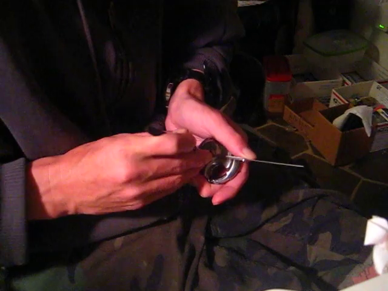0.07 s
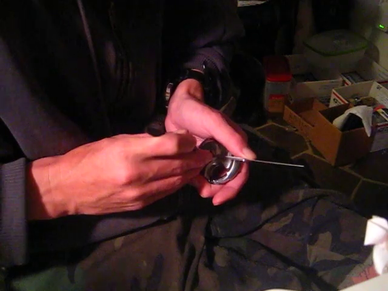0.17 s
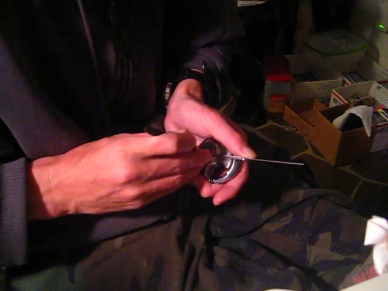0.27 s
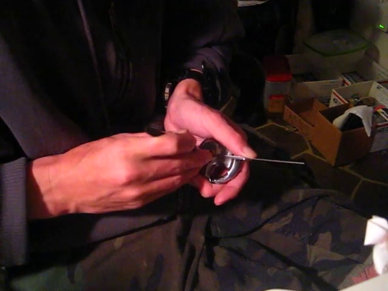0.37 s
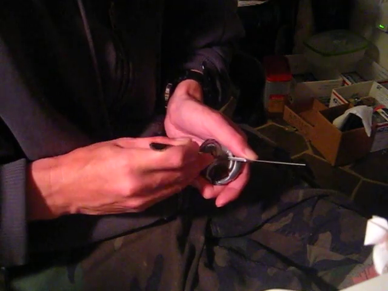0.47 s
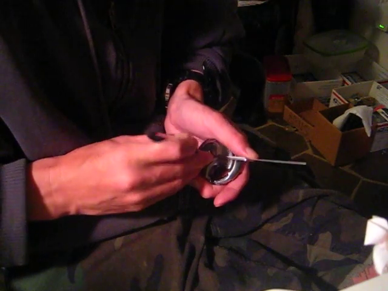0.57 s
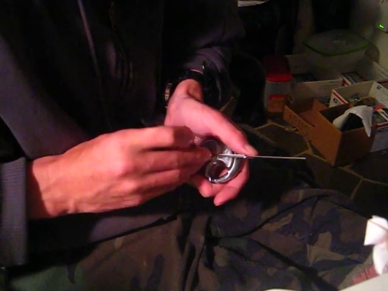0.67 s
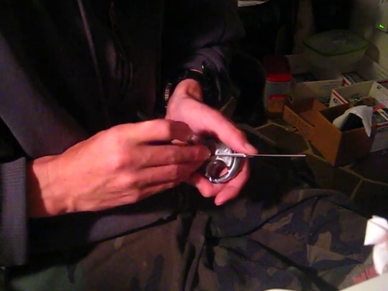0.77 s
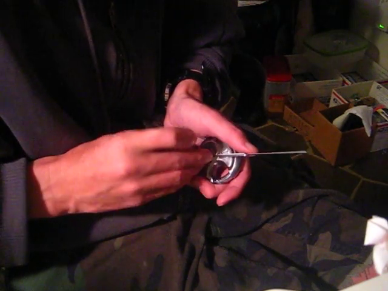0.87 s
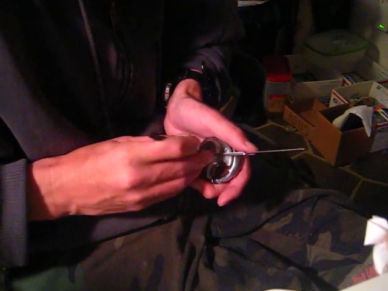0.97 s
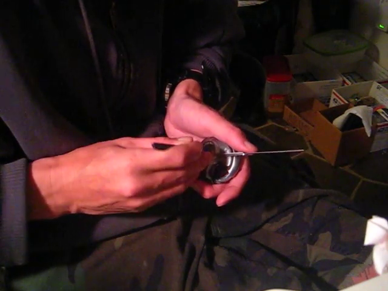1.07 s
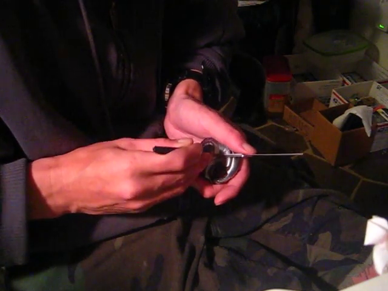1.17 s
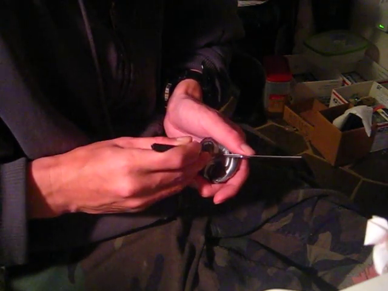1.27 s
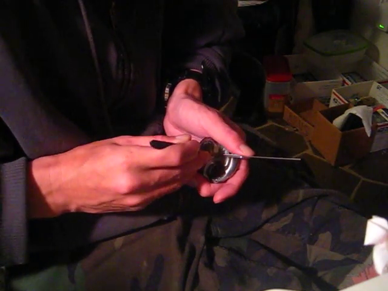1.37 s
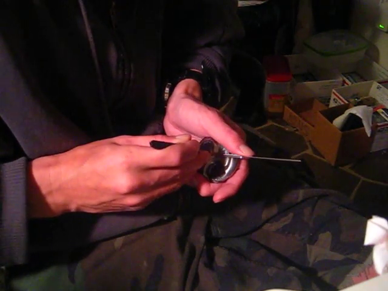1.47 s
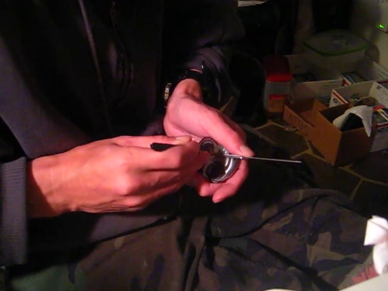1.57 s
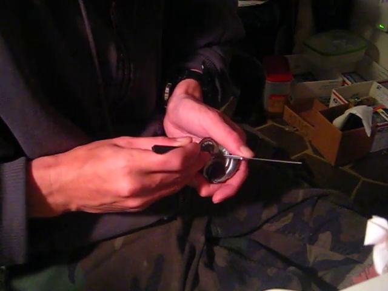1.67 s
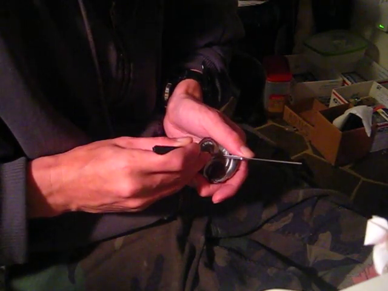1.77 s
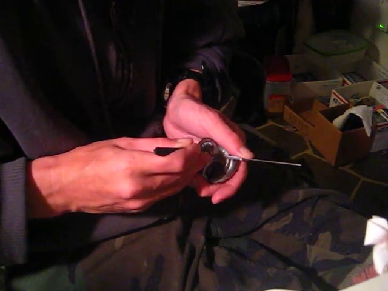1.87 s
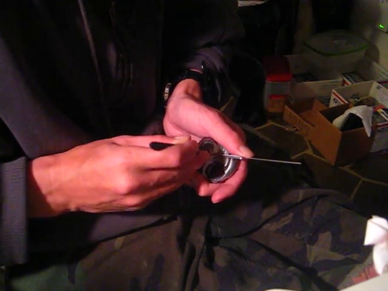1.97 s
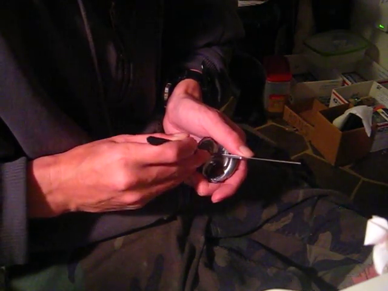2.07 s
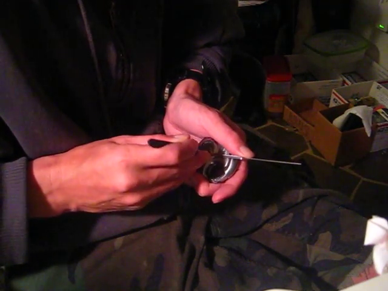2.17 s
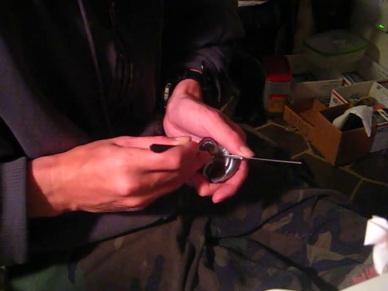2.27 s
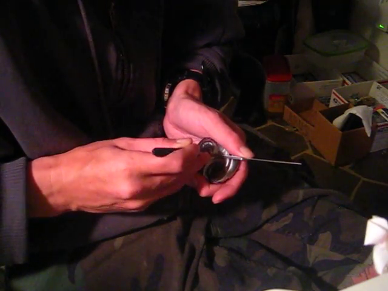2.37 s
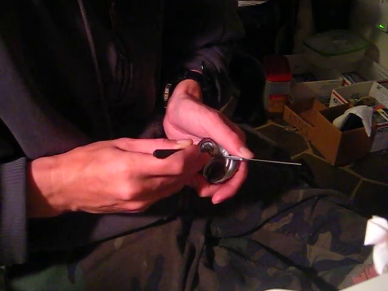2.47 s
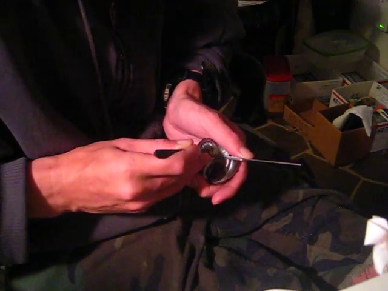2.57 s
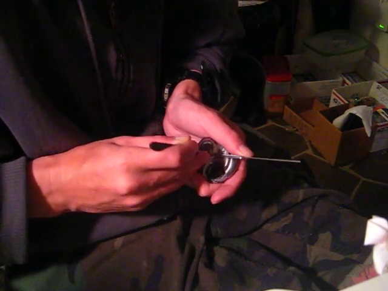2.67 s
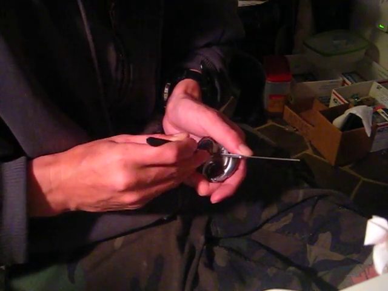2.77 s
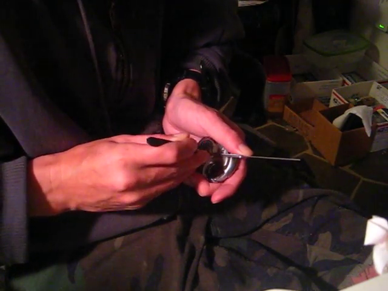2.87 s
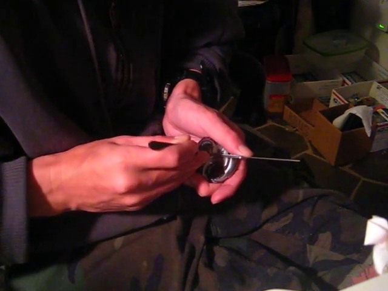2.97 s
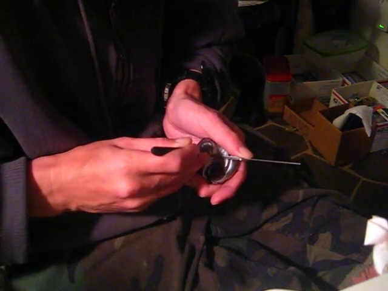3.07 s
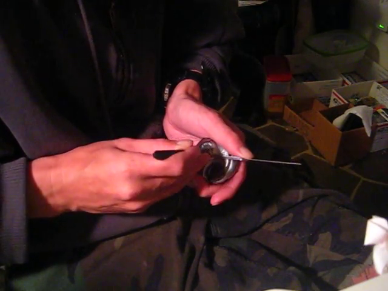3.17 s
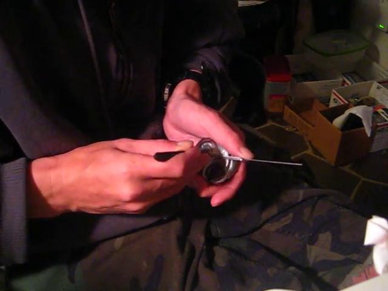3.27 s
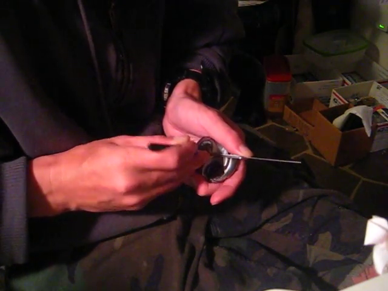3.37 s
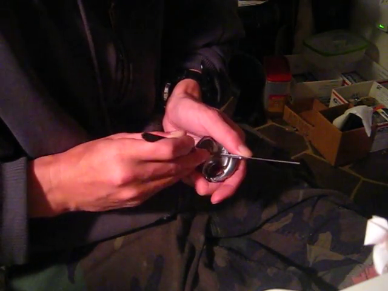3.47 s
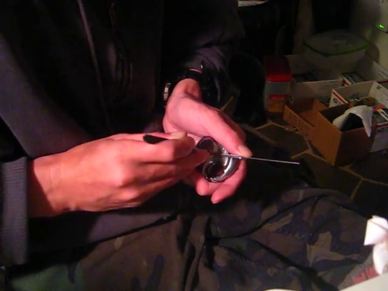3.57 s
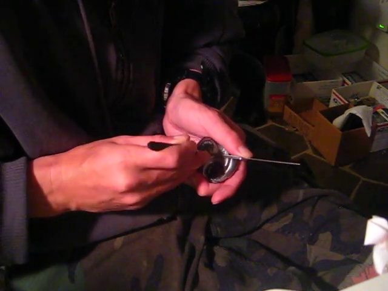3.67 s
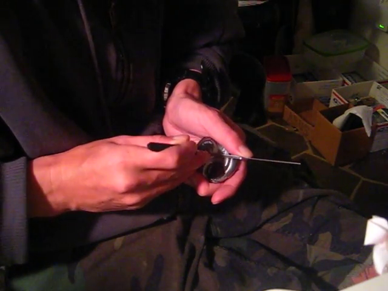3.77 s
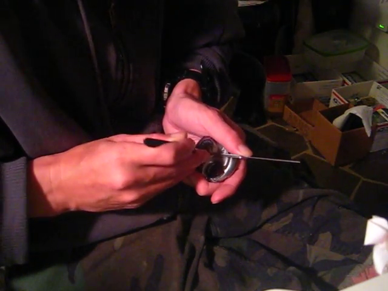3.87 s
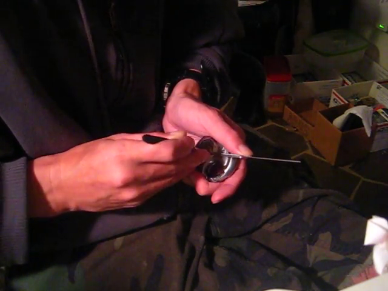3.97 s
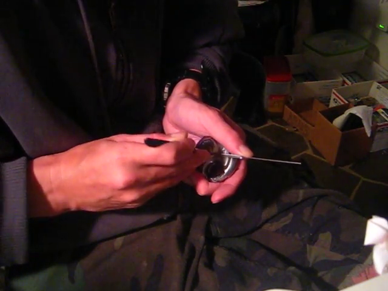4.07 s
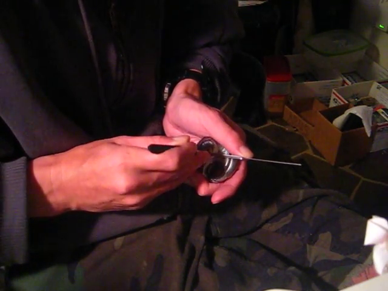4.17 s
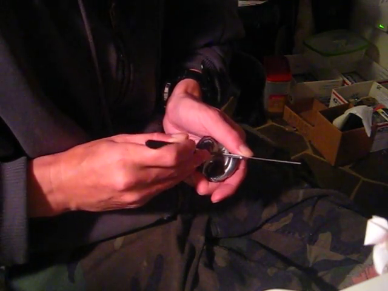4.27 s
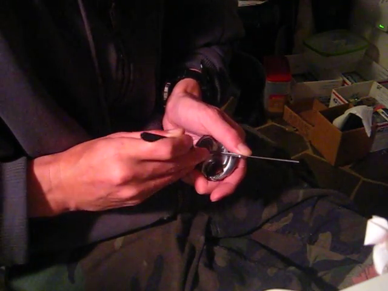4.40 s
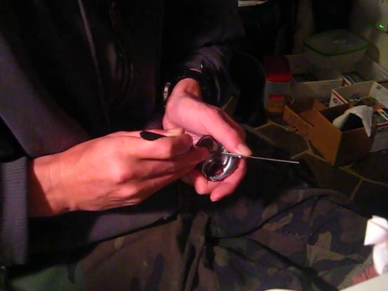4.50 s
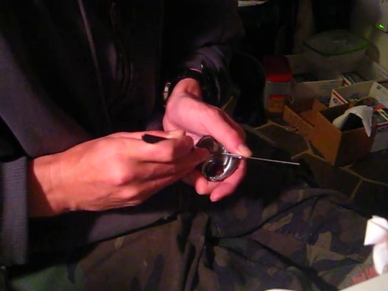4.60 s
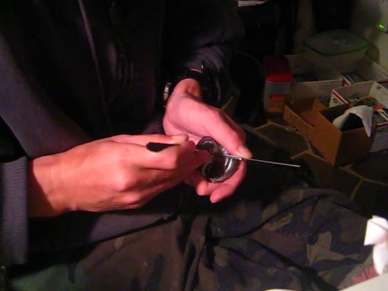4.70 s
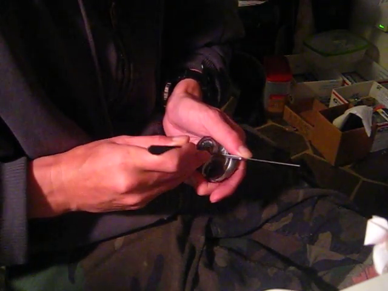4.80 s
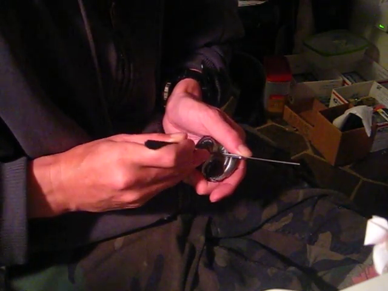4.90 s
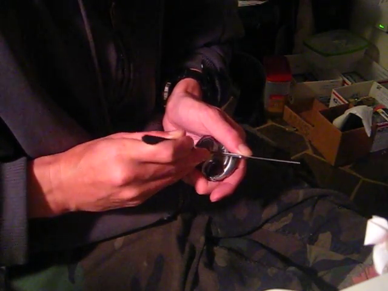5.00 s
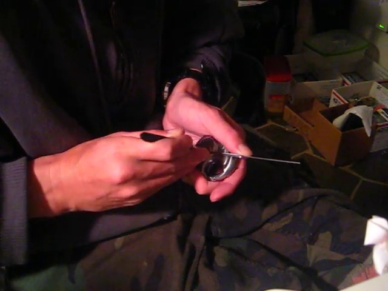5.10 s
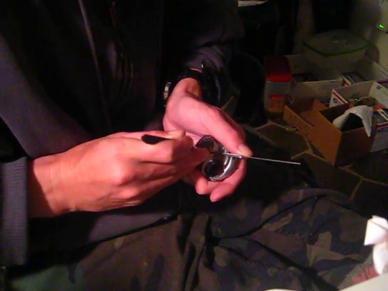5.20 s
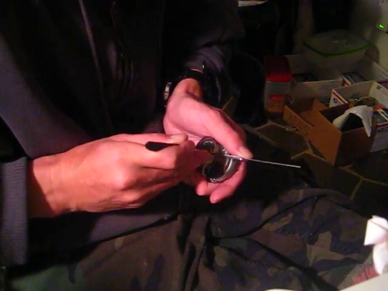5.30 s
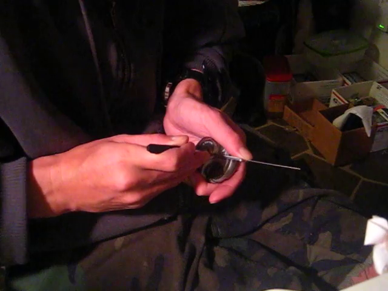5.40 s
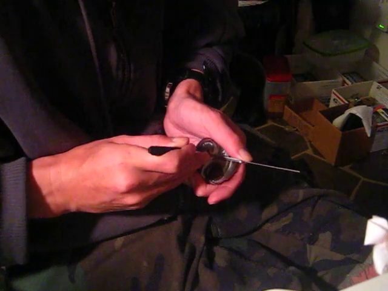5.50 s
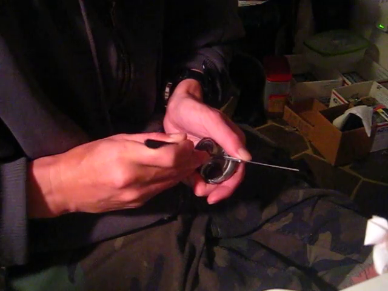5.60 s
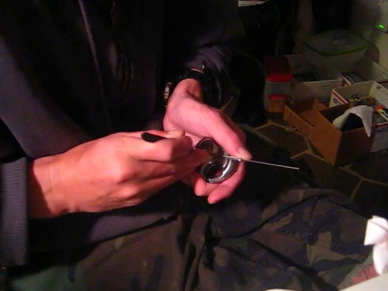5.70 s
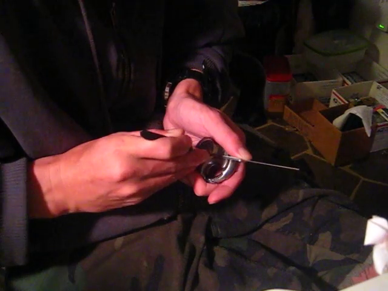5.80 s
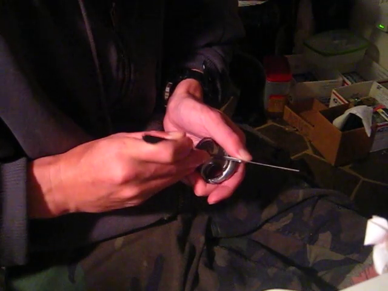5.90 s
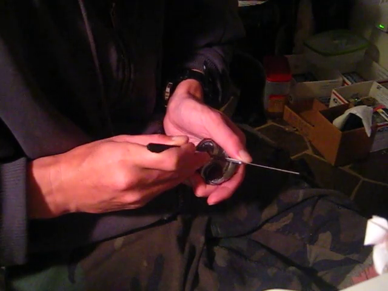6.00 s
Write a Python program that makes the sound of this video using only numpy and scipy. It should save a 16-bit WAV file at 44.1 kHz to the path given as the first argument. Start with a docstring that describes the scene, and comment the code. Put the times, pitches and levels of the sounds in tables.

```python
"""From the start a small camera's microphone hisses, its electronics whine and the bass crackles faintly.
About a metre away a thin steel pick drags over the pins of a hand-held padlock, ringing near 3 kHz.
Then the pick slips: a chatter of a millisecond or two sets the finger-damped lock into free vibration.
Nearby surfaces reflect each sound, and the cluttered room reverberates briefly.
The slips crowd toward the loudest, near 0.9 s; strokes and scattered slips go on until about 6 s."""
import sys
import numpy as np
from scipy import signal
from scipy.fft import rfft, irfft, next_fast_len
from scipy.io import wavfile

SR = 44100
rng = np.random.default_rng(int(sys.argv[2]) if len(sys.argv) > 2 else 0)


def put_to_file(sound):
    """Save the sound as 16-bit audio at rate SR, in the file named by the first command-line argument."""
    columns = np.atleast_2d(sound).T  # one column per channel
    safe = np.clip(columns, -1, 1)
    whole_steps = np.round(safe * 32767)
    wavfile.write(sys.argv[1], SR, whole_steps.astype(np.int16))


N = 266628


def undb(db):
    """Decibel law: amplitude grows tenfold for every 20 dB."""
    return 10 ** (np.asarray(db) / 20)


# Spectrum of the noise floor: f/Hz, relative spectral level/dB
HISS_SPECTRUM = [(40, -2), (350, -5), (2100, -9), (3000, -9.5), (5200, -10.5), (5700, -9.5), (7000, -14.5),
                 (9300, -11.5), (10700, -5), (11900, -10), (12750, -17), (13500, -11), (14450, -10),
                 (15700, -14.5)]
def hiss(level_db=-49.5):
    """Broadband random noise of microphone and room, spectrally shaped, with a slight slow sway."""
    size = next_fast_len(N)
    hz = np.maximum(np.arange(size // 2 + 1) * SR / size, 1)
    knot_hz, knot_db = np.transpose(HISS_SPECTRUM)
    gain = undb(np.interp(np.log(hz), np.log(knot_hz), knot_db))
    noise = irfft(rfft(rng.standard_normal(size)) * gain, size)[:N]
    sway_db = 0.1 * np.interp(np.arange(N), np.linspace(0, N, 60), rng.standard_normal(60))
    return undb(level_db + sway_db) * noise / noise.std()


# Clock tones of the camera: f/Hz, rms level/dB, phase restart rate/Hz (0 runs freely)
CLOCK_TONES = [(7569, -57, 30), (15138, -62, 30), (7866, -61.5, 29.97), (11622, -73, 0), (15734.3, -75, 0),
               (531.4, -76, 0)]
def whine():
    """Phase modulation: a clock tone restarted at every frame splits into lines one frame rate apart."""
    t, out = np.arange(N) / SR, 0
    for hz, db, frame_hz in CLOCK_TONES:
        elapsed = (t + rng.random()) % (1 / frame_hz) if frame_hz else t
        out += undb(db) * np.sqrt(2) * np.sin(2 * np.pi * hz * elapsed)
    return out


# Envelope of the faint bass crackle: t/s, rms level/dB
CRACKLE_LEVELS = [(0, -64), (.5, -70.5), (.7, -58), (2.15, -73.5), (2.3, -59.5), (3.2, -66), (4.25, -61),
                  (5.6, -65), (5.85, -58.5), (6.05, -64)]
def crackle(pops_per_s=150, cutoff_hz=413):
    """Shot noise: random impulses of either sign, band-limited to dull pops."""
    impulses = (rng.random(N) < pops_per_s / SR) * rng.standard_normal(N)
    pops = signal.sosfilt(signal.butter(1, [30, cutoff_hz], "bandpass", fs=SR, output="sos"), impulses)
    pops = signal.sosfilt(signal.butter(1, cutoff_hz, fs=SR, output="sos"), pops)
    times, db = np.transpose(CRACKLE_LEVELS)
    return undb(np.interp(np.arange(N) / SR, times, db)) * pops / pops.std()


# Strokes of the pick over the pins: onset t/s, duration/s, rms level/dB
STROKES = [(0, 0.33, -64), (0.72, 0.26, -64), (1.053, 0.27, -64), (1.52, 0.28, -69), (2.03, 0.29, -62.5),
           (3.14, 0.1, -62), (3.357, 0.1, -61.5), (3.875, 0.47, -63), (5.03, 0.33, -64.5),
           (5.583, 0.47, -64)]
def scrape(slips_per_s=900, fade_s=0.075):
    """Stick-slip friction: dense tiny impulses excite the lock's modes near 3 kHz."""
    occurrence, size = rng.random((N, 2)).T
    polarity = np.sign(size % .01 - .005)
    impulses = (occurrence < slips_per_s / SR) * np.log(size) * polarity
    t = np.arange(2048) / SR
    ring = sum(undb(db) * 1000. ** (-t / (2 * t60)) * np.sin(2 * np.pi * hz * t)
               for hz, db, t60 in LOCK_MODES[1])  # decay times doubled
    friction = signal.fftconvolve(impulses, ring)[:N]
    now = np.arange(N) / SR
    envelope = np.zeros(N)
    for onset, duration, db in STROKES:
        inside_s = np.minimum(now - onset, onset + duration - now)
        envelope += undb(db) * np.clip(1 + inside_s / fade_s, 0, 1) ** 2
    return envelope * friction / friction.std()


# Normal modes of the finger-damped lock: f/Hz, relative level/dB, decay time T60/s
# Six frequency bands, one list each, from low thud (0) through 3 kHz ring (1) to bright tick (5)
LOCK_MODES = [
    [(596, -13, 0.012), (1290, -4, 0.0083), (1740, -3, 0.0062), (2420, 2.5, 0.0073)],
    [(2880, -3.5, 0.0096), (3077, -4, 0.017), (3222, -7.5, 0.019), (3476, -8, 0.02)],
    [(3900, -5, 0.0097), (4150, -6, 0.009)],
    [(4725, 1, 0.0027), (5350, 0, 0.0027)],
    [(6360, 0.5, 0.0046), (6970, 3.5, 0.0054), (7730, 5.5, 0.0034), (8210, 4.5, 0.0012)],
    [(8880, -3, 0.005), (9910, 2, 0.0054), (10840, -3, .004), (12100, -9, 0.0031), (12800, -12.5, 0.005),
     (14000, -6.5, 0.0033), (15330, -12, 0.0033)],
]
def slip(band_peaks, chatter_ms):
    """Modal superposition: each mode is sustained while the contact chatters, then decays exponentially."""
    t = np.arange(2048) / SR
    free_s = np.maximum(t - chatter_ms / 1000, 0)
    out = np.zeros(len(t))
    for peak, modes in zip(band_peaks, LOCK_MODES):
        ring = 0
        for hz, db, t60 in modes:
            strength, phase, tuning = rng.random(3)
            detuned_hz = hz * (1 + 0.045 * (tuning - .5))
            attack = np.minimum(t * hz / 0.33, 1)  # a third of a period
            envelope = undb(db + strength - .5) * attack * 1000. ** (-free_s / t60)
            ring += envelope * np.sin(2 * np.pi * (detuned_hz * t + phase))
        out += peak * ring / np.abs(ring).max()
    return out


# Slips, each a dull knock and a bright snap: t/s, knock level/dB, knock place, snap level/dB, snap place
# A place is a position among the six frequency bands; a level is the peak at that place.
SLIPS = [(0.0336, -28.5, 0.92, -28.5, 4.1), (0.4913, -32, 1.33, -52, 4.9), (0.591, -45, 1.5, -32, 3.7),
         (0.6486, -51, 2.1, -35, 5.3), (0.653, -27.5, 1.4, -20, 4.7), (0.814, -31.5, 2.1, -19, 4.45),
         (0.849, -38, 2.3, -39, 3.9), (0.858, -33, 1.4, -41, 3.1), (0.8852, -41, 1.1, -33, 4.3),
         (0.8939, -31, 0.41, -6, 3.96), (0.955, -54, 1.2, -28.5, 4.2), (1.9873, -25, 1.8, -31, 4.2),
         (2.385, -28.5, 2.8, -20.5, 5.1), (2.5623, -38.5, 1.6, -23.5, 4.9), (3.3963, -45, 2.1, -43, 5.1),
         (3.4388, -39.5, 1.95, -38.5, 4.3), (3.6084, -43, 1.9, -31, 4), (3.636, -40.5, 2.2, -55, 4.9),
         (3.6748, -49, 2.2, -56, 4.9), (3.866, -44, 2.1, -62, 4.1), (4.083, -32.5, 1.26, -26, 4.2),
         (4.1006, -35.5, 1.3, -38, 4.1), (4.7431, -23, 0.99, -15.5, 3.67), (4.749, -24, 0.85, -27, 3.2),
         (5.0539, -33.5, 1.96, -34.5, 4.4), (5.9044, -38, 2.4, -42, 3.9), (5.932, -46, 1.1, -56, 4.8)]
def pick_slips(knock_fall_db=9.5, snap_fall_db=8):
    """Impact excitation: knock and snap add in power; their levels fall as distance in bands squared."""
    out, bands = np.zeros(N + 2048), np.arange(len(LOCK_MODES))
    for onset, knock_db, knock_place, snap_db, snap_place in SLIPS:
        knock = undb(knock_db - knock_fall_db * (bands - knock_place) ** 2)
        snap = undb(snap_db - snap_fall_db * (bands - snap_place) ** 2)
        chatter_ms = 0.3 - 0.044 * snap_db  # weaker snaps chatter longer
        start = int(onset * SR)
        out[start:start + 2048] += slip(np.hypot(knock, snap), chatter_ms)
    return out[:N]


def absorb(x, cutoff_hz):
    """Absorption: cloth and clutter take up the treble, acting as a gentle low-pass."""
    return signal.sosfilt(signal.butter(2, cutoff_hz, fs=SR, output="sos"), x)


# Early reflections from nearby surfaces: delay t/ms, level before absorption/dB, smear/ms, cutoff f/Hz
REFLECTIONS = [(3.18, -19.5, .5, 8600), (7.917, -8.5, 0.39, 5400), (11.13, -16.5, 0.71, 12000),
               (17.6, -21, 4.5, 6500), (23.3, -23.5, 2.4, 7500)]
def room_response(tail_db=-15, t60_s=0.24, tail_cutoff_hz=6500):
    """Reflection and scattering: an impulse returns as echoes smeared by clutter, then a diffuse tail."""
    t = np.arange(SR // 2) / SR
    build_up = np.clip(t / 0.017, 0, 1) ** 2
    tail = build_up * 1000. ** (-t / t60_s) * rng.standard_normal(len(t))
    response = absorb(undb(tail_db) * tail / np.linalg.norm(tail), tail_cutoff_hz)
    for delay_ms, db, smear_ms, cutoff_hz in REFLECTIONS:
        lag_ms = 1000 * t - delay_ms
        echo = (lag_ms > 0) * np.exp(-np.abs(lag_ms) / smear_ms) * rng.standard_normal(len(t))
        echo[np.argmax(lag_ms > 0)] = 4.3  # the specular reflection leads
        response += absorb(undb(db) * echo / np.linalg.norm(echo), cutoff_hz)
    return response


def scene():
    """Linear superposition: direct sound, reflections and noise sum in one signal for both channels."""
    direct = pick_slips() + scrape()
    reflected = signal.fftconvolve(direct, room_response())[:N]
    mono = direct + reflected + hiss() + crackle() + whine()
    return np.array([mono, mono])


def record(dry):
    """Band limiting: the camera's steep low-pass removes the treble above 15790 Hz."""
    return signal.sosfilt(signal.ellip(12, .2, 70, 15790, fs=SR, output="sos"), dry)


dry = scene()
out = record(dry)
put_to_file(out)
```